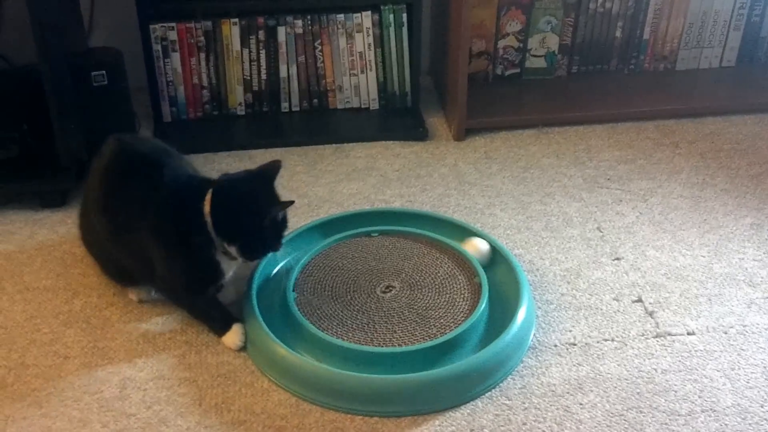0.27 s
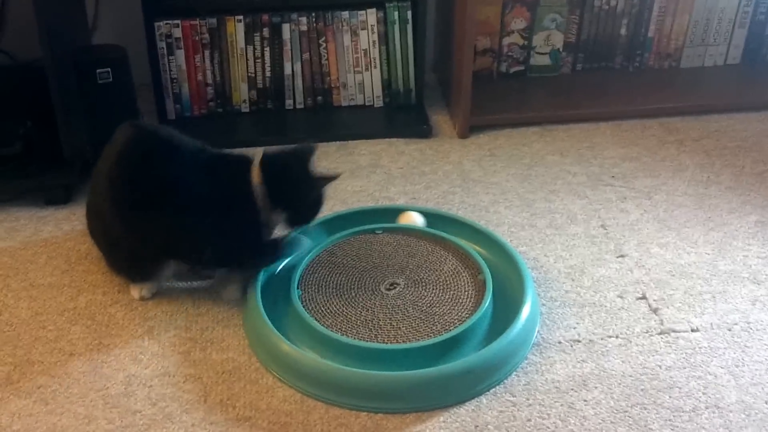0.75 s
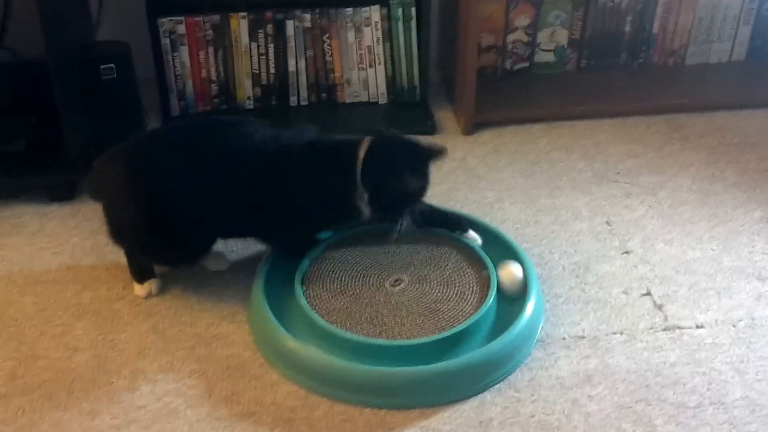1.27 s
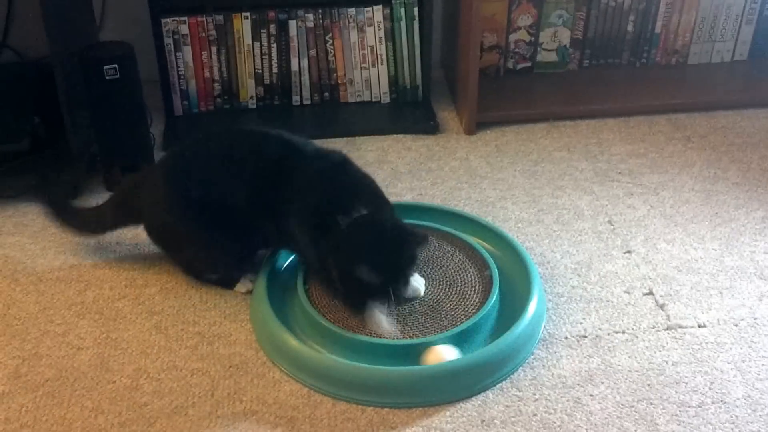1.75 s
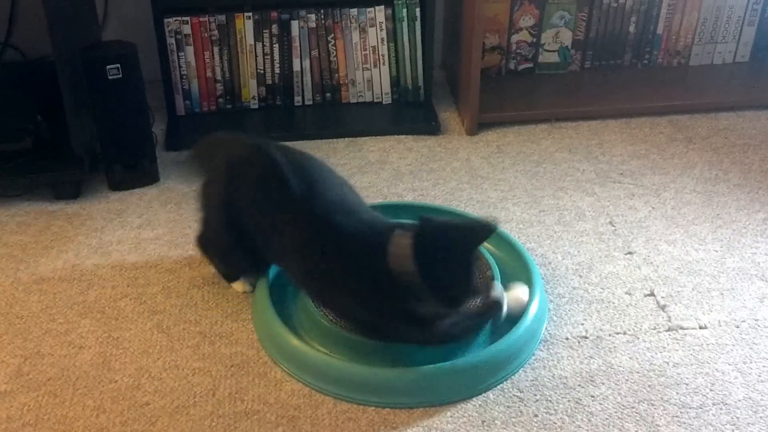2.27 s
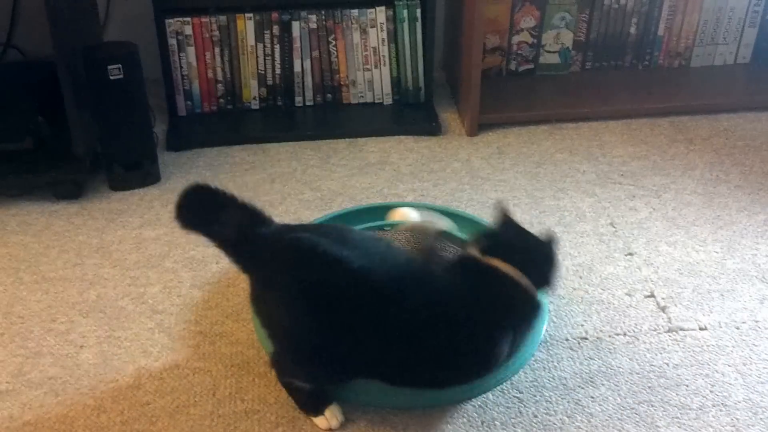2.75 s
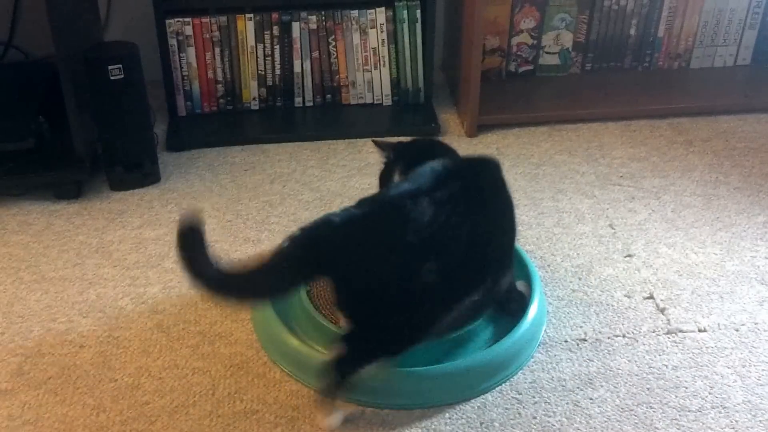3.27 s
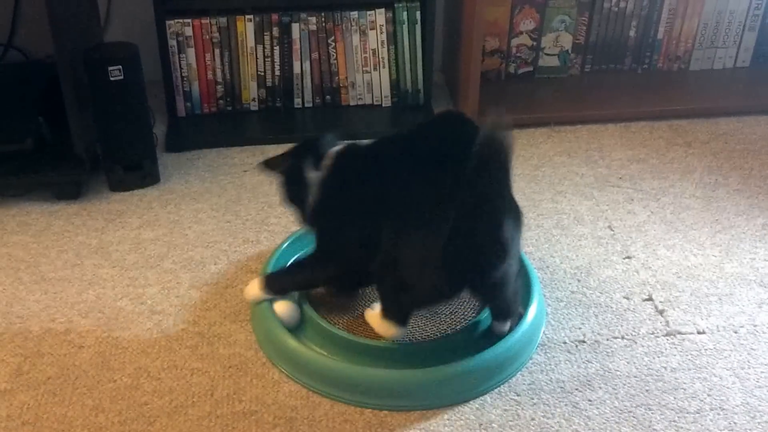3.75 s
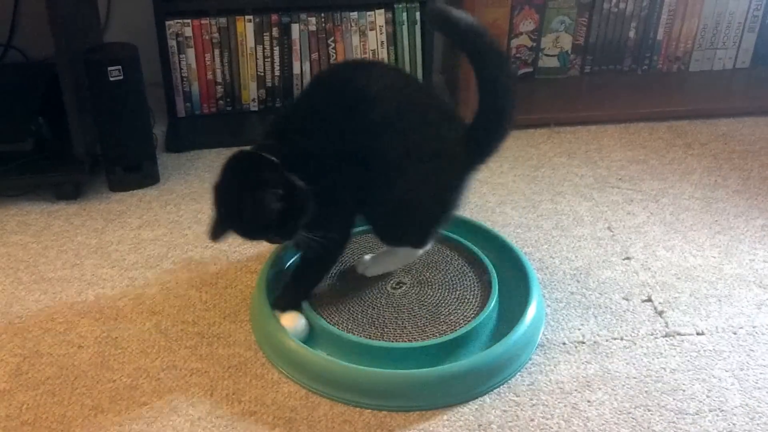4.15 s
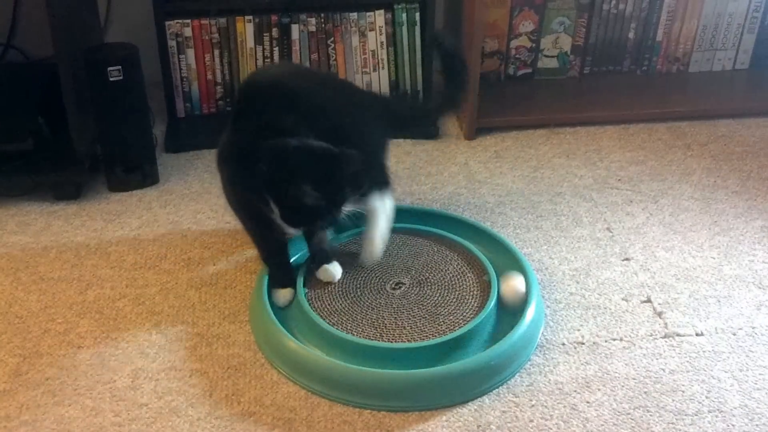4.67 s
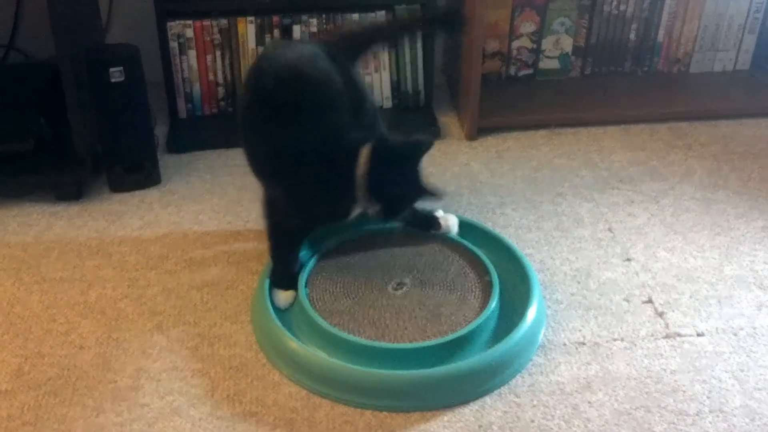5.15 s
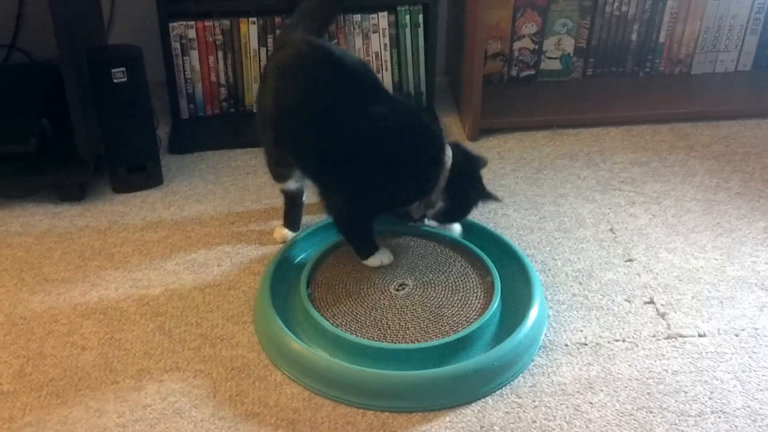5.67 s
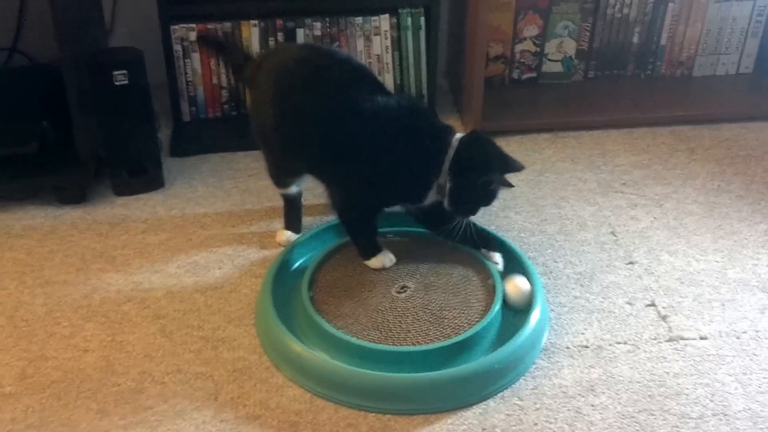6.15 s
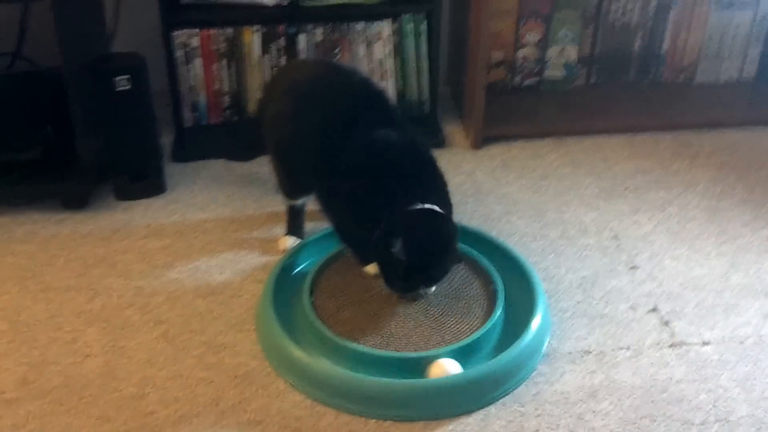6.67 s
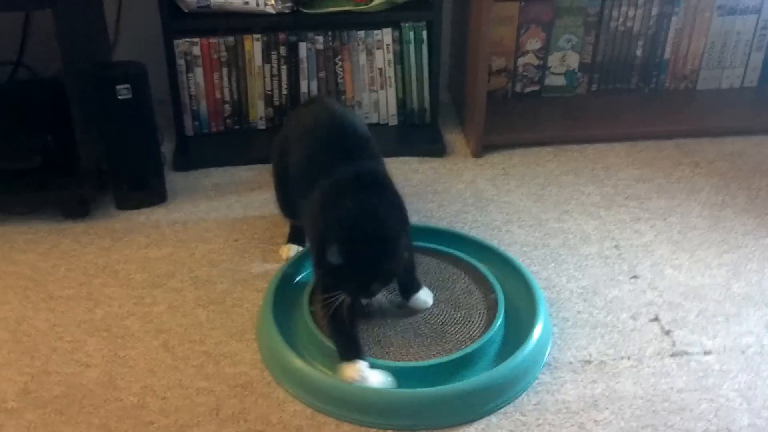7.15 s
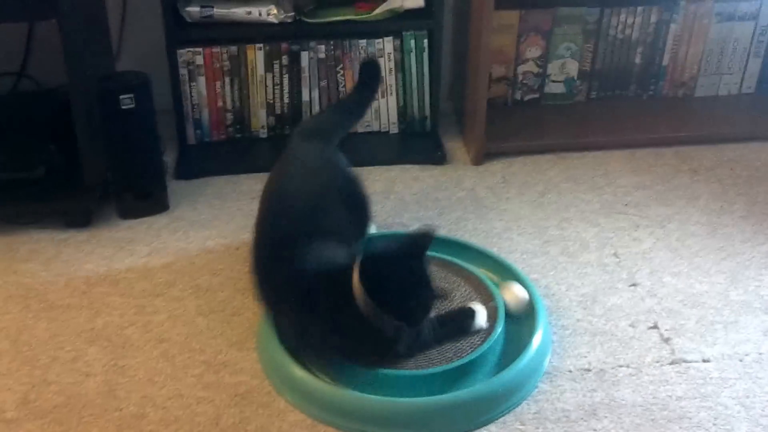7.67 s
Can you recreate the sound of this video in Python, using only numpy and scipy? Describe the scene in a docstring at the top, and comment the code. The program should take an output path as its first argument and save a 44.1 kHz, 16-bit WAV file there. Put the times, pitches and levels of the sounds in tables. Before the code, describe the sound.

A cat plays with a ball in a circular plastic toy. The rolling rattle swells and fades as the ball speeds up or is stopped, with hollow knocks in quick pairs and groups, crisp little claw clicks, short hissy paw drags and muffled landings. Around six and a half seconds a collar bell tinkles very faintly. The pickup is close, in stereo, in a small dry room with a soft fan hum.

```python
"""Ball in a hollow track

A cat bats a light plastic ball round a hollow plastic track on a carpet, heard from close by.
Rolling and knocks excite damped modes of the track; claw ticks and scrapes are shaped noise.
Paw thumps are low sines of falling pitch, and a collar bell tinkles with two decaying partials.
A fan hums as narrow noise bands over room air, and a short diffuse tail follows each hit.
Stereo is formed from two microphone ports and a short delay."""
import sys
import numpy as np
from scipy import signal
from scipy.fft import rfft, irfft, next_fast_len
from scipy.io import wavfile
from scipy.ndimage import uniform_filter1d

SR = 44100
rng = np.random.default_rng(int(sys.argv[2]) if len(sys.argv) > 2 else 0)


def waveform_to_disk(signal):
    """Save audio, clipped to [-1, 1], as 16-bit WAV at the path in sys.argv[1]."""
    frames = np.transpose(np.atleast_2d(signal))
    scaled = np.clip(frames, -1, 1) * 32767
    samples = np.round(scaled).astype(np.int16)
    wavfile.write(sys.argv[1], SR, samples)


N = 348831

# Modes of the hollow track: [f/Hz, level/dB, nominal t60/s (shortened in use)]
TRACK_MODES = [(112, -16.5, 0.62), (163.8, -5, 0.37), (199.4, -3.5, 0.31), (283.3, 10, 0.054),
               (364.5, 5.5, 0.084), (403, 0, 0.057), (478, -2.5, 0.11), (570, -4, 0.051),
               (675.2, -7.5, 0.081), (757.4, -11, 0.12), (821, -27, 0.048), (972, -19, 0.093),
               (1128, -18, 0.03), (1347, -16, 0.048), (1501, -9.5, 0.0071), (1870, -29, 0.0072),
               (2240, -13.5, 0.016)]
# Motion of the ball: [t/s, bump size level/dB, extra level/dB of the track near 375 Hz]
BALL_MOTION = [(0.0, -70.5, 7), (1.1, -68.5, -6.5), (1.38, -62.5, 0), (1.65, -67.5, 5), (2.02, -67, 8.5),
               (2.97, -60, -10), (3.13, -71.5, 1), (3.37, -68.5, -8), (3.7, -64.5, -5.5), (3.9, -65.5, 5.5),
               (4.3, -76, 11.5), (4.4, -63.5, 4), (4.7, -59.5, -3.5), (5.11, -75, 4.5), (5.84, -74, -15),
               (6.03, -66.5, 5), (6.94, -64, -1.5), (7.15, -72, 11), (7.3, -72, 6), (7.4, -69, 2.5),
               (7.73, -61.5, -4.5), (7.91, -68.5, 16)]
# Blows that ring the track: [t/s, level/dB, struck-spot f/Hz, crack level/dB relative to the ring]
TRACK_BLOWS = [(0.57, -12.5, 378, -20), (0.649, -5.5, 540, -27), (1.054, -1, 566, -26.5),
               (1.164, -4.5, 460, -31), (1.239, -7.5, 390, -26), (1.293, 1.5, 470, -24.5),
               (1.351, -11.5, 474, -12.5), (1.537, -12.5, 400, -20), (1.572, -12, 507, -16),
               (2.06, -2.5, 364, -31), (2.069, -6.5, 900, -28), (2.08, -3.5, 543, -14),
               (2.249, -7, 275, -16.5), (2.749, -3.5, 400, -23), (2.795, -5, 716, -24),
               (2.973, -8, 412, -30), (3.0735, -3.5, 805, -15), (3.076, 0.5, 690, -16.5),
               (3.095, -8.5, 1240, -19), (3.113, -3, 444, -22), (3.273, -1.5, 476, -32),
               (3.483, -8, 510, -17.5), (3.509, -5, 473, -26), (3.68, -9, 324, -16),
               (3.841, -1.5, 307, -21), (3.933, -9, 380, -37), (4.343, -11.5, 800, -17),
               (4.384, -12, 400, -18), (4.4315, -7.5, 610, -17), (4.4636, -9.5, 680, -13.5),
               (4.544, -8, 595, -20), (4.585, -9, 403, -16), (4.6976, -12, 587, -21),
               (4.712, -10, 805, -14.5), (4.7337, 2, 720, -16), (4.7425, -5, 800, -20),
               (4.826, -3, 545, -22.5), (5.056, -8, 506, -24), (5.087, -4.5, 285, -25),
               (5.329, -16, 356, -19), (5.432, 1, 314, -25.5), (5.443, -5, 236, -36),
               (5.465, -3.5, 196, -42), (5.989, -8.5, 300, -19.5), (6.088, -6, 362, -23.5),
               (6.189, -5, 410, -24), (6.664, -13, 371, -27), (6.751, -7, 506, -20), (6.887, -4, 770, -29),
               (7.173, -6, 538, -17), (7.325, -6, 624, -35), (7.339, -2.5, 505, -23), (7.369, -7, 425, -21),
               (7.538, -7, 790, -24), (7.551, -9, 500, -13.5), (7.575, 3.5, 446, -22.5),
               (7.777, 4.5, 390, -29), (7.896, 3, 440, -36)]
# Claw contacts on plastic: [t/s, level/dB, brightness/(dB/octave), rattle level/dB relative to the click]
CLAW_CONTACTS = [(0.396, -28, 3, -30), (0.4707, -31.5, 5, -22), (1.038, -20, 5.5, -33),
                 (1.2373, -26, -1, -28), (1.295, -20.5, 5, -29), (1.334, -12.5, 11, -29),
                 (1.6685, -32, -13, -10), (1.709, -15, -1.5, -22), (1.718, -22.5, 1.5, -17),
                 (1.8837, -34, 7, -16), (1.9047, -26.5, -5.5, -16.5), (2.081, -20, -8, -18.5),
                 (2.091, -17, -1, -22), (2.217, -31, -1, -15), (2.32, -25.5, -4, -18.5),
                 (2.378, -27.5, -2.5, -11), (2.4412, -16.5, -5, -22), (2.4664, -19, -10, -18.5),
                 (2.476, -21, -9.5, -13), (2.4837, -31, -12, -17), (2.494, -29, -14, -20),
                 (2.5332, -29.5, -6, -9.5), (2.771, -25, 0.5, -19), (2.9336, -33, 4, -19),
                 (3.397, -21, -2, -17.5), (3.5456, -24, 5, -24.5), (3.767, -18.5, -2, -17),
                 (3.852, -23.5, 9.5, -13), (4.078, -34, 0, -8.5), (4.1074, -17, 9, -27),
                 (4.343, -29.5, -2, -16), (4.362, -28.5, -6, -14.5), (4.4065, -19, 3.5, -12.5),
                 (4.463, -28, -2, -29), (4.7322, -29.5, 15, -11), (4.868, -32, 10, -24),
                 (4.8791, -10, 11, -32), (4.9666, -24.5, 1.5, -18), (4.985, -22, -15, -11),
                 (5.299, -31.5, 5, -22), (5.434, -23, 13, -36), (6.1276, -31.5, 4.5, -17.5),
                 (6.7212, -21.5, -3, -40), (6.7216, -16.5, -16.5, -46), (6.749, -13, -17, -40),
                 (7.1596, -31, 5, -21), (7.195, -23, 10, -18), (7.5391, -25.5, -6, -12.5),
                 (7.754, -19, 3.5, -23), (7.86, -26, 4, -26)]
# Spectrum of a claw click: [f/Hz, relative level/dB]
CLAW_SPECTRUM = [(600, -24), (1200, -7), (2300, 2), (3200, -3.5), (4500, -1.5), (6500, -9), (10000, -8),
                 (13000, -16.5), (15500, -2)]
# Paws dragged over the toy: [start t/s, initial level/dB before the rise, fade/(dB/s)]
PAW_DRAGS = [(1.032, -37, 49), (1.29, -38, 90), (1.532, -33.5, 172), (1.893, -31.5, 148), (2.071, -28, 144),
             (2.16, -42.5, 16), (2.75, -44, 79), (2.91, -39.5, 61), (3.04, -37, 200), (3.39, -37.5, 65),
             (3.76, -37.5, 80), (3.85, -39.5, 87), (4.06, -42, 6), (4.34, -37.5, 62), (4.41, -32.5, 182),
             (4.73, -36, 67), (6.46, -47, 39), (7.15, -36.5, 34), (7.21, -53, 29), (7.54, -32, 77),
             (7.72, -40, 34)]
# Spectrum of the drag hiss: [f/Hz, relative level/dB]
DRAG_SPECTRUM = [(500, 33.5), (1500, 26.5), (2500, 21.5), (4500, 15.5), (7000, 9), (10000, 12.5),
                 (12000, 2), (15000, 13.5)]
# Paws landing on the carpet and the track: [t/s, level/dB before the envelope, final f/Hz]
PAW_LANDINGS = [(1.048, -20.5, 113), (3.648, -25, 99), (3.803, -17, 102), (3.997, -21, 99),
                (4.207, -23, 99), (4.35, -14, 105), (6.128, -23, 101), (7.184, -17.5, 99),
                (7.792, -11.5, 100.5)]
# Touches of the bell's clapper: [t/s, level/dB, reference t60/s]
BELL_TOUCHES = [(6.478, -53, 0.26), (6.507, -44, 0.32), (6.54, -41, 0.13), (6.898, -53, 0.36)]
# Partials of the bell: [f/Hz, relative level/dB, share of the reference t60]
BELL_PARTIALS = [(9800, -3.5, 0.96), (13700, -9, 0.39)]
# Steady room noise: [f/Hz, spectral density level/(dB per Hz)]
AIR_SPECTRUM = [(30, -53.5), (70, -100), (140, -65.5), (240, -59), (400, -75.5), (700, -79.5), (1100, -83),
                (2000, -89.5), (4500, -96.5), (8000, -105), (11500, -106), (15000, -101)]
# Noise bands of the fan: [centre f/Hz, full width at -6 dB/Hz, mean level/dB]
FAN_BANDS = [(218.1, 11.2, -39), (624, 24, -49.5), (852, 99, -54.5), (1248, 10, -60.5)]
# Second port against the first: [f/Hz, level/dB, likeness (0-1), phase/rad]
PORT_RESPONSE = [(29.8, -4, 0.6, 1), (123, -18.5, 0, 3.7), (251, -14.5, 0.24, 2.1), (494, -10, 0.76, 3.03),
                 (1000, -3.5, 0.4, 3.3), (1790, 3.5, 1, 2.8), (2500, 0.5, 0, 3.9), (3800, 2, 0.5, 6.3),
                 (4840, -1, 0.4, 6.7), (6360, -0.5, 0.1, 5.9), (11100, 0, 0.4, 6.1), (12000, 1, 0.2, 4.3),
                 (12800, -1, 0.1, 3.6), (15500, 2, .6, 3.4)]

SURGE_DB = 1.8  # spread of the wobble in the ball's pressure, 25 random values a second
FAST_TILT = 0.04  # dB an octave per dB of bump size: a fast ball sounds brighter
CHATTER, CHATTER_TILT_DB = 0.65, 0.5  # taps all modes share: weight, brightness in dB an octave
ROLL_HISS_DB = 6.5  # hiss of the ball itself, above its bump size
FIRST_S = 0.006  # time constant of the strong first swings of a hard blow
SOFT_RISE_S, HARD_RISE_S = 0.0057, 0.0014  # a soft blow swells, a hard one snaps
PUSH_DB = -7  # single swing of the wall under a hard blow, before its damping
BOUNCE, BOUNCE_S = 0.33, 0.042  # upper limit as a share of the blow; spread of arrival times
RATTLE_S = 0.022  # time constant of the claw rattle
STROKE_RISE_S = 0.017
ROOM_DB = -15  # diffuse tail of the hits
LAG = 16  # port delay in samples
ROLL_OFF_HZ, EDGE_HZ = 15750, 16700  # start of the treble loss, final band limit


def gain_of(db):
    """Level law: an amplitude factor is ten to the power dB/20."""
    return 10 ** (np.asarray(db) / 20)


def evened(x):
    """Normalisation to unit root-mean-square amplitude."""
    return x / np.sqrt(np.mean(x ** 2) + 1e-20)


def read(points, hz, axis=1):
    """Linear interpolation of one table column on a log-frequency axis."""
    points = np.asarray(points)
    return np.interp(np.log(hz + 1), np.log(points[:, 0] + 1), points[:, axis])


def curve(rows, axis):
    """Linear interpolation of one time-table column at every sample."""
    rows = np.array(rows)
    return np.interp(np.arange(N) / SR, rows[:, 0], rows[:, axis])


def wander(points, spread_db):
    """Slow random modulation: normal values in dB joined by straight lines."""
    return spread_db * np.interp(np.arange(N), np.linspace(0, N, points), rng.standard_normal(points))


def coloured(x, db_at):
    """Linear filtering: the spectrum is multiplied by a level curve over frequency."""
    size = next_fast_len(x.shape[-1])
    gain = gain_of(db_at(np.fft.rfftfreq(size, 1 / SR)))
    return irfft(rfft(x, size) * gain, size)[..., :x.shape[-1]]


def add(mix, s, sound):
    """Superposition: a two-port sound is added to the mix from s seconds onward."""
    part = mix[:, round(s * SR):][:, :sound.shape[1]]
    part += sound[:, :part.shape[1]]


def grit(per_s, spread_db):
    """Random impulse process: sparse bumps of unequal size, with a separate sign at each port."""
    present = rng.random(N) < per_s / SR
    size = gain_of(spread_db * np.minimum(rng.exponential(1, N), 5)) * present
    return size * rng.choice([-1., 1.], (2, N))


def rolling():
    """Forced vibration: bumps under the ball, some shared by all modes, excite each damped mode."""
    t, out = np.arange(4000) / SR, np.zeros((2, N))
    taps = evened(grit(110, 2.5))
    size_db = curve(BALL_MOTION, axis=1) + wander(200, SURGE_DB)
    hum_db = curve(BALL_MOTION, axis=2)
    for hz, db, t60 in TRACK_MODES:
        octaves = np.log2(hz / 375)
        ring = gain_of(db - 60 * t / (0.83 * t60)) * np.sin(2 * np.pi * hz * t)
        bumps = evened(grit(200, 2.4))
        bumps = bumps + CHATTER * gain_of(CHATTER_TILT_DB * octaves) * taps
        push_db = size_db + hum_db * np.exp(-(octaves / 0.13) ** 2)
        push_db = push_db + FAST_TILT * (size_db + 73.0) * octaves
        # As the ball travels, each mode swells and fades in its own time
        push_db = push_db + wander(90, 2.2)
        out += signal.oaconvolve(bumps * gain_of(push_db), ring[None], axes=1)[:, :N]
    return out


def knocks():
    """Impulsive excitation: a blow favours modes near its spot; hardness adds crack and bandwidth."""
    t, out = np.arange(9000) / SR, np.zeros((2, N))
    hz, db, t60 = np.transpose(TRACK_MODES)[:, :, None]
    for s, peak_db, spot_hz, crack_db in TRACK_BLOWS:
        hard = np.clip((crack_db + 32) / 20, 0, 1)  # 0 soft, 1 hard
        distance = abs(np.log2(hz / spot_hz))  # octaves from the struck spot
        near_db = db / 2 - (15 - 8 * hard) * distance + 2.63 * rng.standard_normal(hz.shape)
        detune = rng.uniform(.96, 1.04, hz.shape)
        # Phase in turns: the second port is about a quarter turn ahead
        phase = rng.uniform(-.1, .1, (2,) + hz.shape) + [[[0]], [[.25]]]
        # Strong first swings, then the ring
        fading = gain_of(-60 * t / (0.51 * t60)) + 8.7 * hard * np.exp(-t / FIRST_S)
        swings = np.sin(2 * np.pi * (hz * detune * t + phase))
        body = (gain_of(near_db) * fading * swings).sum(axis=1)

        noise = rng.standard_normal((2, len(t)))
        crack = coloured(noise, lambda f: -7.0 * abs(np.log2((f + 1) / 1500)))
        crack *= np.exp(-t / .0015) + .12 * np.exp(-t / .015)

        blow = body / abs(body).max() + gain_of(crack_db) * crack / abs(crack).max()
        blow *= gain_of(peak_db)
        blow *= np.minimum(t / (SOFT_RISE_S + (HARD_RISE_S - SOFT_RISE_S) * hard), 1)
        push = np.sin(2 * np.pi * spot_hz * t) * np.exp(-1.3 * spot_hz * t)
        blow += hard * gain_of(peak_db + PUSH_DB) * push
        add(out, s, blow)

        # Four small bounces of random sign and size; the later ones have a lower limit
        for later, size in rng.random((4, 2)):
            share = BOUNCE * (1 - 0.86 * later) * (2 * size - 1)
            add(out, s + 0.0086 + BOUNCE_S * later, share * blow)
    return out


def ticks():
    """Brief contact: a broadband snap sounds over a crackly rattle that begins with it and decays."""
    t, out = np.arange(7000) / SR, np.zeros((2, N))
    for s, peak_db, bright_db, rattle_db in CLAW_CONTACTS:
        def colour(f):
            """Spectral tilt: brightness slopes the claw spectrum about 4 kHz, up to 11 kHz."""
            octaves = np.log2((np.minimum(f, 11000) + 300) / 4000)
            return read(CLAW_SPECTRUM, f) + bright_db * octaves

        # One contact and its scatter, 40 samples in so that filter ripple can precede it
        snap = .3 * rng.standard_normal((2, len(t))) * np.exp(-t / .001) + (t == 0)
        snap = coloured(np.roll(snap, 40, axis=1), colour)
        snap = snap * np.minimum(t / .001, 1) * np.exp(-t / .02)

        # Squared noise makes it crackly; its spectrum is duller than the snap's
        crackle = rng.standard_normal(len(t)) ** 2 * rng.standard_normal((2, len(t)))
        rattle = evened(coloured(crackle, lambda f: colour(f) - 2.2 * np.log2(1 + f / 4000)))
        rattle = rattle * (np.exp(-t / RATTLE_S) + 1.5 * np.exp(-t / .003))  # strongest at first
        add(out, s, gain_of(peak_db) * (snap / abs(snap).max() + gain_of(rattle_db) * rattle))
    return out


def scraping():
    """Sliding friction: fur and claws over the toy give patchy hiss mixed with fine grit."""
    source = rng.standard_normal((2, N)) + 0.92 * evened(grit(1200, 0.36))
    hz, _, z = signal.stft(source, SR, nperseg=256)
    patches = uniform_filter1d(rng.standard_normal(z.shape[1:]), size=14, axis=0)
    patches = evened(uniform_filter1d(patches, size=14, axis=1))
    gain = gain_of(3 * patches + read(DRAG_SPECTRUM, hz)[:, None])
    drag = signal.istft(z * gain, SR, nperseg=256)[1][:, :N]
    return strokes() * evened(drag)


def strokes():
    """Addition of powers: drags that rise quickly and fade join the faint hiss of the ball."""
    t = np.arange(N) / SR
    power = gain_of(curve(BALL_MOTION, axis=1) + ROLL_HISS_DB) ** 2
    for s, peak_db, fade_db in PAW_DRAGS:
        since = np.maximum(t - s, 0)
        rise = np.minimum(since / STROKE_RISE_S, 1)
        power = power + (rise * gain_of(peak_db - fade_db * since)) ** 2
    return np.sqrt(power)


def thumps():
    """Damped low-frequency motion: a soft push whose pitch sags towards its final value."""
    t, out = np.arange(9000) / SR, np.zeros((2, N))
    for s, peak_db, hz in PAW_LANDINGS:
        turns = hz * (t + 0.0097 * (1 - np.exp(-t / 0.011))) + rng.random((2, 1))
        envelope = t / 0.034 * np.exp(1 - t / 0.014)
        add(out, s, gain_of(peak_db) * envelope * np.sin(2 * np.pi * turns))
    return out


def bell():
    """Free vibration: the clapper touches the collar bell's shell and its partials decay."""
    t, out = np.arange(14000) / SR, np.zeros((2, N))
    rise = np.minimum(t / 0.0038, 1)
    for s, db, t60 in BELL_TOUCHES:
        for hz, mode_db, share in BELL_PARTIALS:
            turns = hz * t + rng.random((2, 1))
            decay = gain_of(db + mode_db - 60 * t / (share * t60))
            add(out, s, decay * np.sin(2 * np.pi * turns) * rise)
    return out


def room(x):
    """Diffuse reverberation: random-sign reflections decay, the treble sooner on the carpet."""
    taps = np.zeros((2, SR // 2))
    at = np.arange(200, SR // 2 - 20, 20)
    at = at + rng.integers(0, 20, (2, len(at)))
    np.put_along_axis(taps, at, rng.choice([-1., 1.], at.shape), 1)
    hz, t, z = signal.stft(taps, SR, nperseg=256)
    t60 = read([(200, 0.18), (2000, 0.21), (12000, 0.0041)], hz)[:, None]  # f/Hz, t60/s
    tail = signal.istft(z * gain_of(-60 * t / t60), SR, nperseg=256)[1]
    return signal.fftconvolve(x, tail / np.linalg.norm(tail[0]), axes=1)[:, :N]


def room_air():
    """Stationary noise: a broadband floor carries the fan's narrow bands of wavering level."""
    air = coloured(rng.standard_normal((2, N)), lambda hz: read(AIR_SPECTRUM, hz))
    out = air * np.sqrt(SR / 2)  # density per Hz to amplitude
    for hz, width, db in FAN_BANDS:
        noise = rng.standard_normal((2, N))
        tone = coloured(noise, lambda f: -20 * np.log10(1 + (2 * (f - hz) / width) ** 2))
        out += gain_of(db + wander(25, 2.5)) * evened(tone)
    return out


def scene():
    """Superposition of sources: row 0 is the first port, row 1 what only the second port hears."""
    hits = knocks() + ticks() + bell() + thumps()
    return rolling() + hits + scraping() + gain_of(ROOM_DB) * room(hits) + room_air()


def record(dry):
    """Stereo by delay: mid is port one minus its delayed self, side port two plus its delayed self."""
    size = next_fast_len(N + 4096)
    hz = np.fft.rfftfreq(size, 1 / SR)
    first, apart = rfft(dry, size)
    like = np.clip(read(PORT_RESPONSE, hz, axis=2), 0, 1)
    shared = like * np.exp(1j * read(PORT_RESPONSE, hz, axis=3)) * first
    second = gain_of(read(PORT_RESPONSE, hz)) * (shared + np.sqrt(1 - like ** 2) * apart)

    delay = np.exp(-2j * np.pi * hz * LAG / SR)
    mid = first * (1 - delay) / 2
    side = second * (1 + delay) / 2

    # A step down at the roll-off, then a steady slope in dB per kHz
    top_db = -22.0 * (hz > ROLL_OFF_HZ) - 8.9 * np.maximum(hz - ROLL_OFF_HZ, 0) / 1000
    band = gain_of(top_db) / np.sqrt(1 + (85 / (hz + 1)) ** 4)  # the microphones pass little deep bass
    out = irfft(np.array([mid + side, mid - side]) * band, size)[:, :N]
    low_pass = signal.firwin(511, EDGE_HZ, window=("kaiser", 9), fs=SR)
    return signal.oaconvolve(out, low_pass[None], "same")


dry = scene()
out = record(dry)
waveform_to_disk(out)
```